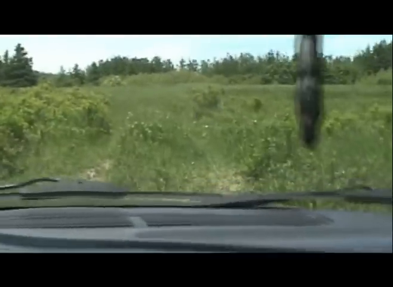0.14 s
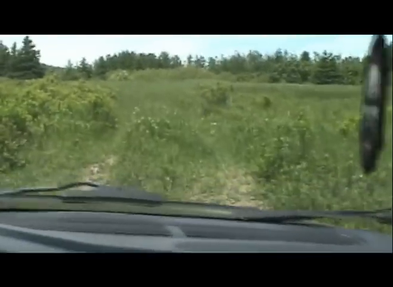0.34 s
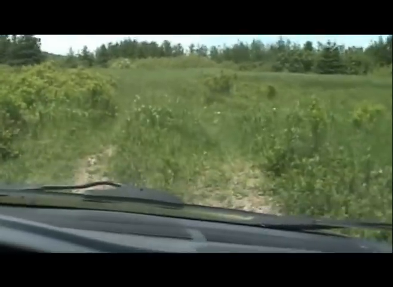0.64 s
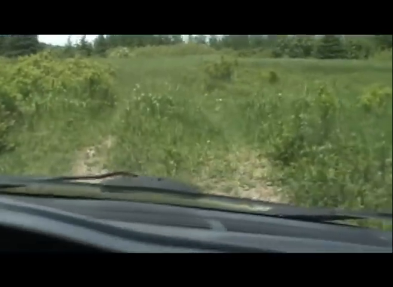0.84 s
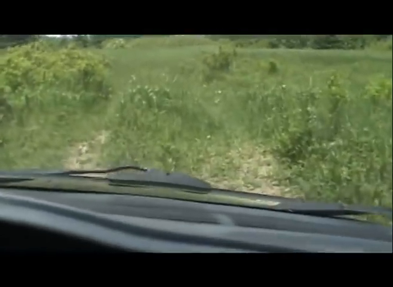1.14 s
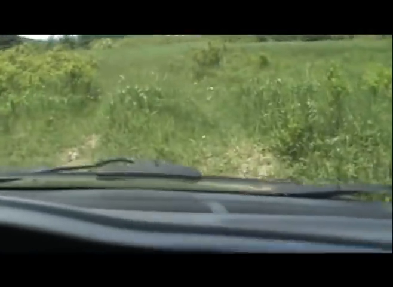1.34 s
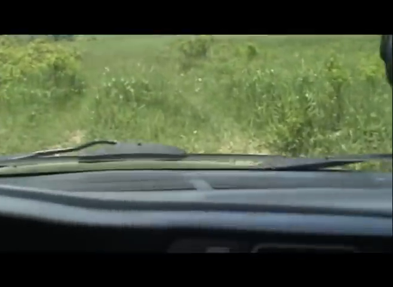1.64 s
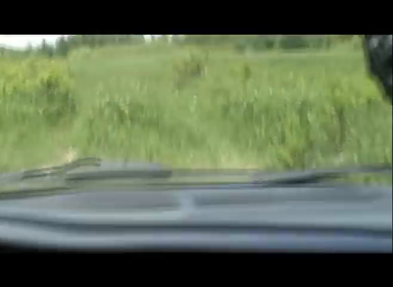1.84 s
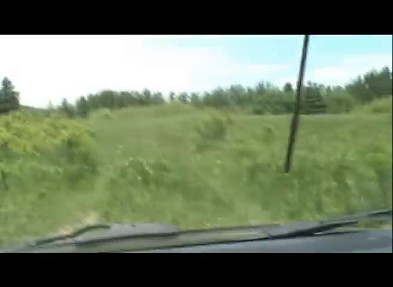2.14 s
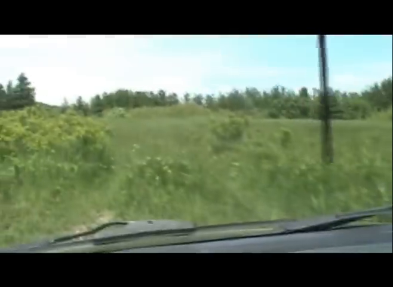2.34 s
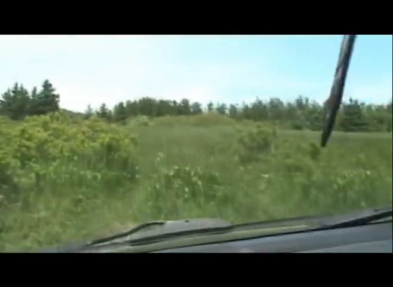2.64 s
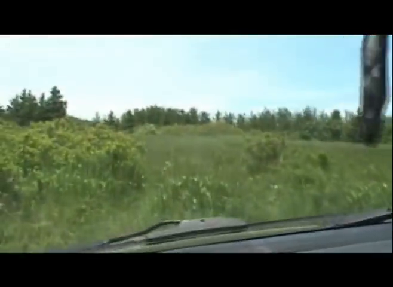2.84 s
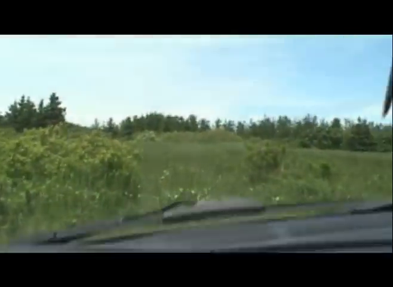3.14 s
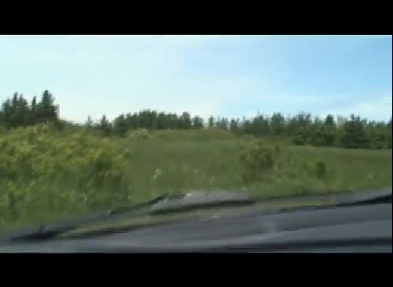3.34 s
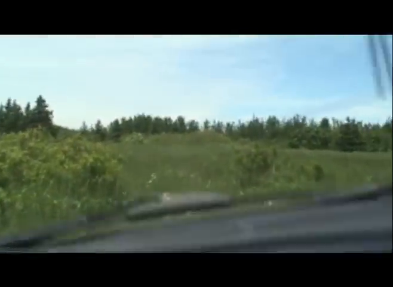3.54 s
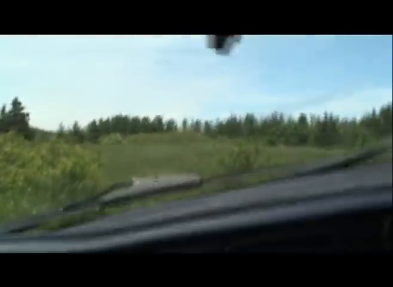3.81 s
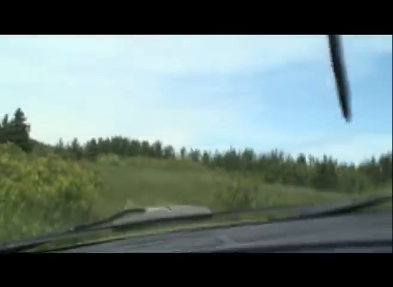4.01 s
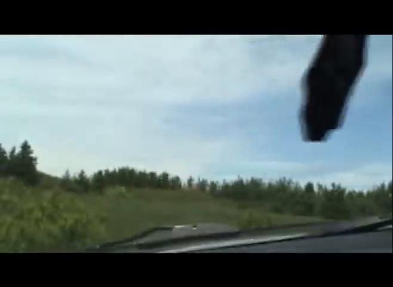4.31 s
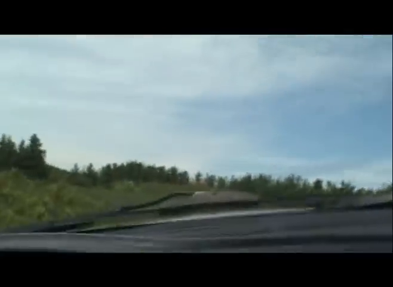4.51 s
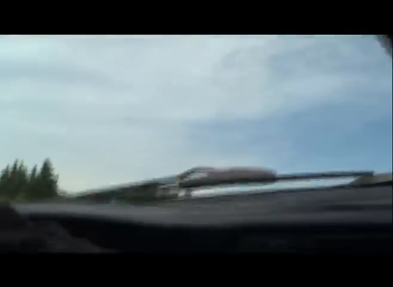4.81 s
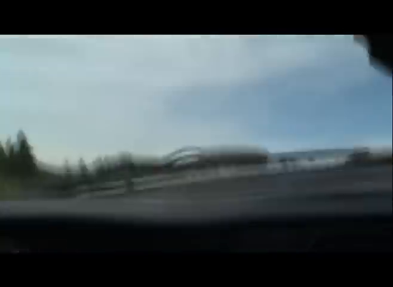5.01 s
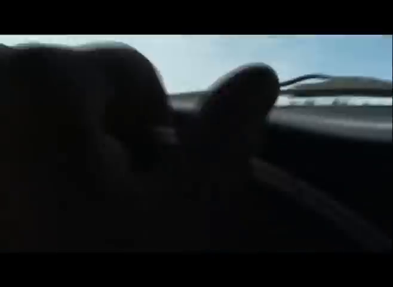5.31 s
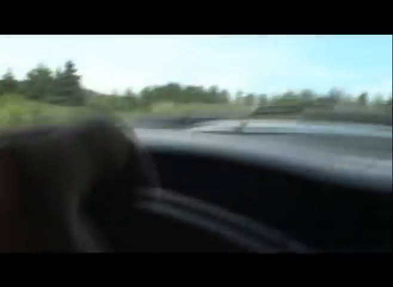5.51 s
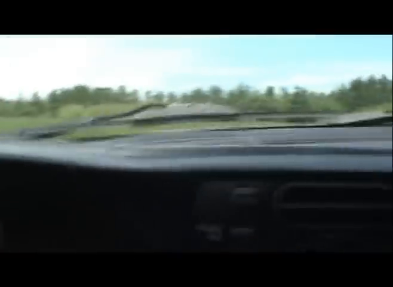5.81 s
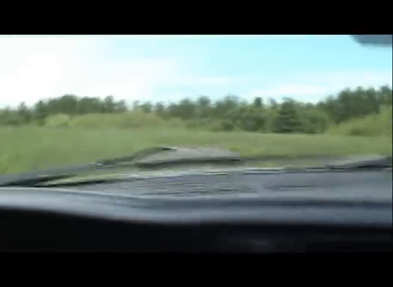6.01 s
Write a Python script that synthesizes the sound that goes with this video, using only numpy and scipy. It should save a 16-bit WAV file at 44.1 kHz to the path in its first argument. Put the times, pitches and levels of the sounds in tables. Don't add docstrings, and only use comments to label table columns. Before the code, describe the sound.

Inside a truck cab, a low engine hums and booms while trim rattles, hollow knocks and heavy suspension thuds grow harsher over rough ground.

```python
import sys
import numpy as np
from scipy import signal
from scipy.fft import rfft, irfft
from scipy.io import wavfile
from scipy.ndimage import uniform_filter1d

SR = 44100
rng = np.random.default_rng(int(sys.argv[2]) if len(sys.argv) > 2 else 0)


def wav_record(signal):
    frames = np.transpose(np.atleast_2d(signal))
    bounded = np.clip(frames, -1, 1)
    quanta = np.round(bounded * 32767).astype(np.int16)
    wavfile.write(sys.argv[1], SR, quanta)


def gain_from_db(level_db):
    decades = np.asarray(level_db, float) / 20
    return 10 ** decades


N = 271656
T = np.arange(N) / SR
LAG_S = 0.00006
# [f/Hz, level per Hz/dB]
FINE = [(1500, 3.5), (3000, -0.5), (5000, -4), (8000, -9), (11000, -19.5), (12700, -27)]


def curve(table):
    s, *columns = np.transpose(table)
    return [np.interp(T, s, c) for c in columns]


def on_hz(points, size):
    hz, value = np.transpose(points)
    return np.interp(np.log(np.fft.rfftfreq(size, 1 / SR) + 1), np.log(hz), value)


def colour(x, points):
    y = irfft(rfft(x) * gain_from_db(on_hz(points, N)), N)
    return y / np.std(y)


def resonance(x, hz, width):
    b, a = signal.iirpeak(hz, hz / width, SR)
    return signal.lfilter(b, a, signal.lfilter(b, a, x))


def walk(rate):
    k = int(SR / rate)
    steps = np.repeat(rng.standard_normal(N // k + 1), k)
    return 0.853 * uniform_filter1d(uniform_filter1d(steps, k), k)[:N]


def wavering_tone(hz):
    return np.sin(2 * np.pi * np.cumsum(hz) / SR)


def add(track, s, sound):
    i = max(int(s * SR), 0)
    track[..., i:i + sound.shape[-1]] += sound[..., :N - i]


def ports(near, other):
    # [f/Hz, level difference/dB]
    right_under = [(60, 17), (110, 17.5), (200, 23), (380, 16.5), (700, 14), (1290, 10), (2380, 7.5),
                   (4400, 4), (8120, 4), (15000, -1.5)]
    # [f/Hz, share]
    alike = [(30, 0.95), (130, 0.75), (300, 0.75), (700, 0.25), (1500, 0.055), (4000, 0.099), (7000, 0.058),
             (15000, 0.11)]
    share = np.clip(on_hz(alike, N), 0, 1)
    early = np.exp(2j * np.pi * np.fft.rfftfreq(N, 1 / SR) * LAG_S)
    right = share * early * rfft(near) + np.sqrt(1 - share ** 2) * rfft(other)
    return np.array([near, irfft(right * gain_from_db(-on_hz(right_under, N)), N)])


def cab(x):
    t = T[:SR // 4]
    tail = rng.standard_normal(len(t)) * 1000 ** (-t / 0.053)
    return signal.fftconvolve(x, tail / np.linalg.norm(tail))[:N]


def air():
    # [f/Hz, level per Hz/dB]
    hiss_spectrum = [(12, -37), (20, 17.5), (124, 4), (178, -23), (310, -59), (571, -8), (1460, -1.5),
                     (2770, -41), (5530, -13.5), (10500, -25), (12700, -55), (13800, -101), (15000, -98)]
    # [f/Hz, width/Hz, level/dB]
    vent_band = (5480, 690, -65.5)
    # [f/Hz, width/Hz, level/dB, loudest at t/s, length/s]
    whines = [
        (8000, 40, -57, 0.99, 0.9),
        (5820, 160, -62, 1.8, 3.3),
    ]
    out = gain_from_db(-43.5 + 1.0 * walk(6.2)) * colour(rng.standard_normal(N), hiss_spectrum)
    vent_hz, vent_width, vent_db = vent_band
    out = out + gain_from_db(vent_db + 24.5) * resonance(rng.standard_normal(N), vent_hz, vent_width)
    for hz, width, db, s, length in whines:
        fade_db = -9 * ((T - s) / length) ** 2
        level_db = db + 3 * walk(3.3) - 10 * np.log10(width / SR) + fade_db
        out = out + gain_from_db(level_db) * resonance(rng.standard_normal(N), hz, width)
    return out


def engine():
    # [t/s, firing rate f/Hz, level of the second multiple/dB]
    effort = [(0.0, 36.97, -42.5), (1.53, 39.6, -45.5), (1.7, 42.98, -36.5), (2.43, 39.87, -52),
              (2.49, 38.98, -30), (2.76, 37.58, -36), (3.3, 43.08, -38.5), (3.65, 38, -33),
              (3.84, 41.32, -38), (3.96, 41.08, -25.5), (4.46, 40.28, -29), (4.6, 38.23, -28.5),
              (4.91, 39.96, -32), (5.04, 42.28, -35), (5.44, 42.7, -36), (5.66, 40.3, -28),
              (5.83, 38.03, -32.5), (6.0, 42.3, -31)]
    # [multiple of the firing rate, level over the idle hum/dB]
    multiples = [(1, -0.5), (2.5, -4.5), (3.5, 2), (4, -0.5), (4.5, -22), (5, 2.5), (6, -7), (6.5, -1),
                 (10, -6), (10.5, -19)]
    idle_db = -35.5
    hz, second_db = curve(effort)
    pull_db = 0.27 * (second_db - idle_db)
    turn = 2 * np.pi * np.cumsum(hz * (1 + 0.013 * walk(9))) / SR
    hum = gain_from_db(second_db + 6.5 + 3.6 * walk(13)) * np.sin(2 * turn)
    for multiple, db in multiples:
        level_db = idle_db + db + (multiple > 3) * pull_db + 2.6 * walk(8.0)
        hum = hum + gain_from_db(level_db) * np.sin(multiple * turn + 6 * rng.random())
    return hum


def boom():
    # [t/s, f/Hz, peak level/dB, length/s]
    heaves = [(0.08, 31, -41, 0.1), (0.66, 33.2, -39, .12), (1.75, 34.04, -37, 0.18),
              (2.7, 35.38, -29.5, 0.77), (3.28, 34.73, -23, 0.045), (3.6, 27.91, -33, 0.28),
              (3.94, 28.4, -21.5, 0.12), (4.9, 30.45, -24, .2), (5.28, 28.05, -26, 0.056),
              (5.6, 31.4, -22.5, 0.24), (6.16, 35.88, -21, 0.16)]
    hz = curve(heaves)[0]
    swell = gain_from_db(-45.5)
    for s, _, db, length in heaves:
        swell = swell + gain_from_db(db) * np.exp(-np.abs(T - s) / (0.82 * length))
    return swell * gain_from_db(5.5 + 2.2 * walk(9)) * wavering_tone(hz * (1 + 0.047 * walk(4.59)))


def rumble(body_db):
    # [f/Hz, width/Hz, level/dB]
    panels = [(22, 11, 0.5), (58.3, 33.5, -2), (125.6, 49, -2), (175.7, 41.4, 3), (236.2, 33, 0),
              (279, 64, -5.5), (354, 16, -6.5), (417.5, 14, -8), (482, 28, -6.5)]
    # [t/s, level/dB]
    load = [(0, 0.5), (3.3, -1.5), (3.6, 3), (4.6, -0.5), (5.1, 4), (6.16, 7)]
    load_db = curve(load)[0]
    body = np.zeros(N)
    for hz, width, db in panels:
        level_db = db + (hz > 300) * load_db + 2.0 * walk(16)
        body += gain_from_db(level_db) * resonance(rng.standard_normal(N), hz, 2.29 * width)
    return gain_from_db(body_db + 7.0) * body / np.std(body)


def rattle(points, rate, scatter_db, smear_s):
    size_db = scatter_db * np.minimum(rng.exponential(size=N), 4)
    hits = (rng.random(N) < rate / SR) * gain_from_db(size_db)
    puffs = signal.lfilter([1], [1, -np.exp(-1 / (smear_s * SR))], hits)
    return colour(puffs * rng.standard_normal(N), points)


def steady(jolt, chatter):
    # [t/s, shaking of the body level/dB, jiggling of loose parts level/dB]
    ride = [(0.0, -38, -41), (0.55, -37.5, -37), (1.17, -31.5, -40.5), (1.45, -36, -40.5), (1.9, -37, -37),
            (2.13, -30.5, -32), (2.35, -37.5, -36), (2.55, -27.5, -36), (2.8, -27.5, -32.5),
            (3.0, -31.5, -36.5), (3.4, -24, -33), (3.62, -27.5, -29), (4.0, -26, -29), (4.6, -24, -30.5),
            (4.84, -15.5, -23.5), (4.97, -22, -23), (5.06, -30, -31.5), (5.5, -37, -34.5)]
    # [f/Hz, level per Hz/dB]
    trim_spectrum = [(300, 6), (600, 7.5), (1000, 2), (1700, -4.5), (2800, -17), (5000, -39.5)]
    body_db, jiggle_db = curve(ride)
    trim_level = gain_from_db(jiggle_db + 4) + gain_from_db(-15.5) * jolt
    trim = trim_level * rattle(trim_spectrum, rate=750, scatter_db=1.5, smear_s=0.011)
    fine_level = gain_from_db(np.maximum(jiggle_db - 8.5, -44)) + gain_from_db(-12.5) * chatter
    fine = fine_level * rattle(FINE, rate=900, scatter_db=-1.5, smear_s=0.0046)
    top_cut = signal.ellip(8, 0.5, 50, 12700, fs=SR, output="sos")
    return signal.sosfilt(top_cut, rumble(body_db) + trim + fine + air())


def groan():
    # [t/s, f/Hz, level/dB]
    twist = [(3.42, 405, -60), (3.53, 392, -28), (3.7, 392, -34), (3.9, 413, -29.5), (4.1, 424, -33.5),
             (4.2, 398, -39), (4.34, 425, -28), (4.48, 388, -36), (4.62, 392, -53)]
    hz, db = curve(twist)
    return gain_from_db(db + 7.5 + 2.1 * walk(25.14)) * wavering_tone(hz * (1 + 0.0126 * walk(29.93)))


def rustle():
    # [t/s, half length/s, level/dB]
    slides = [(3.545, 0.028, -35), (4.818, 0.14, -33.5), (2.47, .06, -46), (2.8, .04, -41),
              (2.941, 0.023, -44.5), (3.23, 0.046, -40.5), (4.454, 0.089, -43), (4.972, .025, -32),
              (5.407, 0.072, -44), (5.672, 0.12, -45), (6.117, 0.059, -43)]
    swell = sum(gain_from_db(db) * np.exp(-((T - s) / half) ** 2) for s, half, db in slides)
    grains = rattle(FINE + [(13200, -80)], rate=400, scatter_db=3.0, smear_s=0.0056)
    return swell * gain_from_db(1.7 * walk(60)) * grains


def joints():
    # [t/s, level/dB, f/Hz, width/Hz]
    squeaks = [(1.016, -34, 4220, 300), (1.736, -43, 3800, 1300), (1.761, -36, 3900, 1000),
               (1.815, -37, 3700, 1500), (3.62, -42, 3600, 300), (5.151, -37, 6300, 600),
               (5.49, -36, 4450, 310), (5.701, -25, 2120, 313), (5.724, -24, 3670, 540),
               (5.723, -27.5, 3000, 370), (2.351, -44, 3470, 300), (2.415, -44.5, 3470, 300),
               (2.461, -41, 3040, 560), (2.3, -41, 3470, 300), (2.605, -42, 3600, 500),
               (2.841, -42, 3470, 300), (4.953, -19, 4150, 1600), (4.853, -28, 5400, 700),
               (4.748, -28, 5300, 1100), (5.038, -30, 1290, 250), (4.5, -36, 2300, 630),
               (5.19, -36, 2940, 500), (5.19, -43, 4600, 880), (4.7, -40, 4300, 600),
               (5.398, -37.5, 2600, 1400), (5.477, -40, 4200, 500), (5.535, -38.5, 2900, 700),
               (5.626, -44, 3820, 400), (5.658, -39, 3900, 1400), (6.05, -48, 3900, 290),
               (2.009, -38, 3150, 1500), (2.15, -39, 3000, 1500), (1.955, -37, 2600, 1700),
               (1.745, -38, 1420, 200), (1.69, -37, 1430, 200), (0.62, -46, 3600, 300),
               (0.66, -40, 4000, 500), (0.77, -46, 3600, 400), (0.886, -44.5, 2900, 980),
               (1.045, -39, 2000, 900), (2.6, -32, 1800, 1500), (4.786, -24, 1240, 440),
               (4.885, -28, 2050, 1200), (4.985, -22, 2360, 340), (5.833, -17, 2080, 700),
               (3.06, -36, 1250, 300), (3.19, -30, 2100, 1200), (3.22, -32, 1300, 900),
               (2.8, -27, 1300, 1000), (0.055, -46, 5000, 3000), (0.47, -46, 2300, 1500),
               (0.582, -34, 2000, 900)]
    out, t = np.zeros(N), T[:SR // 12]
    fade = np.minimum(t / 0.002, 1) * 1000 ** (-t / 0.038)
    for s, db, hz, width in squeaks:
        ring = resonance(rng.standard_normal(len(t)), hz, width)
        add(out, s, gain_from_db(db + 7) * ring / np.std(ring) * fade)
    return out


def case():
    # [t/s, level/dB, modes [f/Hz, level/dB, time to fall 60 dB/s]]
    strikes = [
        (3.3594, -18.5, [(1630, 0, 0.037), (1995, -0.5, 0.042), (2611, -19, 0.08), (3343, -21, 0.088), (3970, -4, 0.022), (5335, -5, 0.035), (5870, 1, 0.022)]),
        (3.7316, -16, [(1184, -1, 0.053), (1670, -7, 0.061), (1965, 2, 0.032), (2540, -5, 0.061), (2860, -12, 0.055), (3332, -5, 0.024), (3790, -5, 0.036), (4899, -21, 0.062)]),
        (4.2135, -18, [(1168, -12, 0.078), (1685, -23, 0.16), (1976, 2, 0.032), (2347, -7, 0.037), (2620, -16, 0.065), (3900, -8, 0.046), (4950, -16, 0.037)]),
        (5.2014, -28.5, [(1544, 0, 0.059), (2500, -6, 0.066), (3020, -10, 0.094), (3930, -19, 0.33)]),
        (5.2757, -19, [(1740, -0.5, 0.029), (2097, -0.5, 0.033), (3930, -6, 0.032), (5028, -29, 5.0), (5922, -33, 5.0)]),
        (5.8324, -15.5, [(2379, -10, 0.06), (2731, -4, 0.09), (3186, 2, 0.043), (4479, -10, 0.09), (4850, -6, 0.032), (5300, -22, 0.15)]),
        (5.906, -15.5, [(1432, -4, 0.045), (1556, -14, 0.1), (1964, -1, 0.046), (2379, -13, 0.06), (3854, -20, 0.077), (4183, -14, 0.055), (4500, -13, 0.056)]),
        (0.567, -31.5, [(1200, -7, 5.0), (1860, -3, 0.38), (2218, -10, 0.23), (2540, -1, 0.067), (3085, -12, 0.35), (4240, -16, 0.59)]),
    ]
    out, t = np.zeros(N), T[:SR // 10]
    for s, db, modes in strikes:
        ring = np.zeros(len(t))
        for hz, mode_db, t60 in modes:
            tone = np.sin(2 * np.pi * hz * t + 2 * np.pi * rng.random())
            ring += gain_from_db(mode_db) * tone * 1000 ** (-t / np.clip(t60, 0.015, 0.042))
        add(out, s, gain_from_db(db) * ring * np.minimum(t / 0.00092, 1))
    return out


def clicks():
    # [t/s, peak level/dB, left minus right/dB]
    soft = [(0.567, -27.5, 15), (0.685, -38, 18), (1.017, -35, 12), (1.07, -35, 14), (1.8055, -40, 14),
            (2.0827, -35.5, 9), (2.1199, -37, 18), (2.794, -19.5, 9.5), (2.8143, -24, 7),
            (3.0739, -30.5, 10), (3.1775, -28, 6), (3.5225, -25.5, 9), (3.5583, -24, 10), (4.6716, -24, 6),
            (4.7604, -33, 2), (4.9054, -20.5, 7), (5.0788, -27, 7), (5.2015, -24, -1), (5.2757, -22, 7),
            (5.7017, -28.5, -1)]
    hard = [(1.7348, -41, 6), (1.7615, -39, 6), (1.933, -31.5, 6), (2.035, -30, 7), (2.9282, -42, 14),
            (3.0529, -37, 3.5), (3.1994, -27.5, 1), (3.3592, -16, 1), (3.7316, -9.5, 7.5), (4.7003, -23, 6),
            (4.7307, -21, 12), (4.802, -18, 11), (4.82, -19, 11), (4.853, -14.5, 3), (4.9537, -19, 4),
            (5.1506, -38, 1), (5.252, -47, -4), (5.3324, -25, 3), (5.7254, -23, 6), (5.8321, -14, 13)]
    crisp = [(3.2845, -30, -2), (3.692, -26, 4), (3.7755, -26, 6), (4.2134, -18.5, 8), (4.367, -31, 4),
             (4.4132, -33, 19), (4.4493, -36, 8), (4.4795, -26, 10.5), (4.7457, -16.5, -5.5),
             (5.0182, -26, 0), (5.5367, -32.5, -2), (5.6259, -30.5, -3), (5.906, -13, 6.5)]
    glassy = [
        (1.2772, -25.5, 8.3),
        (2.5148, -36.5, 2.8),
        (3.5791, -29.5, 1),
        (4.3993, -37, 5.3),
    ]
    keys = [
        (5.4886, -30.5, 0),
        (5.9918, -23, 2.2),
    ]
    # [hits, body level/dB, brightness/dB, top level/dB, time to fall 60 dB/s]
    kinds = [(soft, 0, -23.5, -26, 0.14), (hard, -1.9, -10.5, -19, 0.056), (crisp, -2.6, -12.5, -16.5, 0.094),
             (glassy, -1.4, -5, -8, 0.1), (keys, -3.1, 0, 0.75, 0.085)]
    # [f/Hz, level/dB, decay scale/s; each mode falls 60 dB in 2.2 times
    tin_modes = [(4490, -14, 0.06), (5932, 0, 0.072), (7973, -4, 0.09), (9577, -10, 0.048)]
    # [t/s, level/dB]
    tin_strikes = [
        (5.838, -30),
        (5.912, -35),
        (5.995, -40),
    ]
    out, t = np.zeros((2, N)), T[:4096]
    crack = np.exp(-t / 0.0038) + 0.5 * np.exp(-((t - 0.008) / 0.00042) ** 2)
    onset = np.minimum(t / 0.0004, 1)
    for hits, body_db, bright_db, top_db, t60 in kinds:
        tilt_db = top_db - bright_db
        shape_db = on_hz([(900, 2 * body_db + 1.5), (2200, body_db - 4.5), (3800, body_db / 2 - 10.5),
                          (6000, bright_db), (10000, top_db - 4.0), (14000, top_db - 19.5 + 1.9 * tilt_db),
                          (15500, top_db - 17 + 2.2 * tilt_db), (16000, -90)], len(t))
        tail = 0.5 * 1000 ** (-t / np.clip(t60, 0.03, 0.13))
        for s, db, pan_db in hits:
            noise = rng.standard_normal((4, len(t)))
            lumps_db = 7 * uniform_filter1d(noise[3], 25)[:len(shape_db)]
            pair = irfft(rfft(noise[0] + 0.5 * noise[1:3]) * gain_from_db(shape_db + lumps_db))
            level = gain_from_db(db + 7 + np.array([[pan_db], [-pan_db]]) / 2)
            add(out, s, level * pair * onset * (crack + tail))
    fade = np.minimum(t / 0.0026, 1) * np.hanning(2 * len(t))[len(t):]
    for s, db in tin_strikes:
        ring = np.zeros(len(t))
        for hz, mode_db, t60 in tin_modes:
            ring += gain_from_db(db + mode_db) * np.sin(2 * np.pi * hz * t) * 1000 ** (-t / (2.2 * t60))
        add(out, s, ring * fade)
    return out


def knocks():
    # [t/s, peak level/dB, f/Hz]
    hollow_knocks = [(0.332, -25, 610), (0.57, -22.5, 814), (0.643, -19.5, 550), (1.237, -22.5, 601),
                     (1.933, -21, 620), (2.036, -17.5, 890), (2.119, -3.5, 708), (2.145, -14, 700),
                     (2.283, -18.5, 560), (2.711, -18, 557), (2.792, -13, 680), (2.921, -32, 630),
                     (3.176, -27, 596), (3.359, -17, 543), (3.523, -20, 677), (3.73, -6.5, 770),
                     (4.214, -11, 760), (4.535, -15, 800), (4.731, -10, 604), (4.802, -9.5, 1240),
                     (4.906, -14, 670), (4.964, -11, 957), (4.976, -8, 955), (4.988, -4.5, 1002),
                     (5.277, -17.5, 995), (5.379, -22.5, 850), (5.836, -14, 894), (5.908, -7, 900),
                     (5.945, -18.5, 734), (6.125, -18.5, 793),
                     (0.101, -29, 619), (0.193, -28, 565), (0.377, -32, 778), (0.409, -24, 606),
                  (0.478, -31, 614), (0.522, -38, 845), (0.715, -24, 700), (0.883, -30, 571),
                  (1.009, -24, 501), (1.038, -21, 506), (1.816, -30, 538), (1.912, -31, 678),
                  (2.01, -28, 724), (2.333, -30, 735), (2.448, -32, 1030), (4.659, -23, 650),
                  (5.079, -22, 640), (5.132, -25, 511), (5.149, -28, 727), (5.398, -23, 824),
                  (5.476, -25, 600), (5.701, -22.5, 700), (6.078, -29, 721)]
    out, t = np.zeros(N), T[:SR // 6]
    contact = np.minimum(t / 0.0015, 1) * (1 + np.exp(-t / 0.004))
    fade = 1000 ** (-t / 0.06)
    mode_ratio = np.array([[1], [0.8], [1.2], [0.65], [1.5]])
    mode_level = np.array([0.91, 0.49, 0.41, 0.22, 0.22])
    for s, db, hz in hollow_knocks:
        detune, phase = rng.standard_normal((2, 5, 1))
        mode_hz = hz * mode_ratio * (1 + 0.033 * detune)
        ring = mode_level @ np.sin(2 * np.pi * mode_hz * t + phase)
        add(out, s, gain_from_db(db - 2.5) * ring * contact * fade)
    return out


def thuds():
    # [t/s, peak level/dB, f/Hz]
    suspension = [(0.507, -24.5, 154), (0.674, -27, 148), (1.002, -21, 155), (1.034, -14.5, 146),
                  (1.059, -19.5, 227), (1.106, -17, 159), (1.181, -25, 170), (1.294, -22.5, 180.7),
                  (1.754, -11.5, 191.6), (2.711, -20, 214.6), (3.188, -20, 254), (3.515, -21, 203.6),
                  (3.621, -16, 233.6), (4.668, -14, 319), (4.031, -11.5, 164), (4.079, -15.5, 156.5),
                  (4.141, -22, 200), (4.183, -17.5, 191), (4.377, -25, 198), (4.537, -14, 244.3),
                  (4.713, -3, 210), (4.722, -6, 285), (4.756, -6.5, 230.5), (4.811, -8.5, 201),
                  (4.832, -11, 380), (4.852, -14, 271), (5.041, -22, 240.5), (5.27, -20.5, 143),
                  (5.834, -16.5, 221), (6.014, -27, 149)]
    # [t/s, peak level/dB, f/Hz, rebound level/dB]
    bottoming = [
        (2.497, -8.5, 232.5, 0.5),
        (2.598, -8, 226, -2.5),
        (2.768, -5.5, 217, -1.5),
        (2.918, -7.5, 223, -5),
        (3.197, -2.5, 207.4, -6),
        (3.349, -5.5, 264.4, -12),
    ]
    # [f/Hz, level/dB]
    answers = [(148, -7), (290, -7), (400, -17.5)]
    push_s = 0.0037
    out, t = np.zeros(N), T[:SR // 8]
    swell = (t / (3 * push_s)) ** 3 * np.exp(3 - t / push_s)
    angle = 2 * np.pi * (t - 3 * push_s)
    blows = list(suspension)
    for s, db, hz, back_db in bottoming:
        blows.append((s, db, hz))
        blows.append((s + 0.027, db + back_db, hz * 1.062))
    for s, db, hz in blows:
        phase, *shifts = 2 * np.pi * rng.random(4)
        ring = np.sin(hz * angle + phase)
        for (answer_hz, answer_db), shift in zip(answers, shifts):
            ring = ring + gain_from_db(answer_db) * np.sin(answer_hz * angle + phase + shift / 4)
        add(out, s - 0.005, gain_from_db(db + 2.5) * swell * ring)
    return out


def scene():
    blows, ticks = thuds(), clicks()
    jolt = uniform_filter1d(np.abs(blows), SR // 40)
    span = int(0.064 * SR)
    bustle = uniform_filter1d(uniform_filter1d(np.abs(ticks[1]), span), span)
    chatter = np.sqrt(bustle + 1e-9) / 10
    hits = blows + knocks() + joints()
    near = steady(jolt, chatter) + engine() + boom() + hits + gain_from_db(-8.5) * cab(hits)
    other = steady(jolt, chatter) + cab(hits)
    ticks = ticks + (case() + rustle()) * gain_from_db(np.array([[2.5], [-2.5]]))
    hz = np.fft.rfftfreq(N, 1 / SR)
    late = np.exp(-2j * np.pi * hz * LAG_S * np.exp(-hz / 2000))
    ticks = np.array([irfft(rfft(ticks[0]) * late, N), ticks[1]])
    tick_echo = np.array([cab(c) for c in ticks])
    return ports(near + groan(), other) + ticks + gain_from_db(-7.0) * tick_echo


def band_limit(x):
    return signal.sosfilt(signal.butter(12, 15750, fs=SR, output="sos"), x)


def record(dry):
    mix = np.clip(dry, -1, 1)
    return band_limit(mix)


dry = scene()
out = record(dry)
wav_record(out)
```